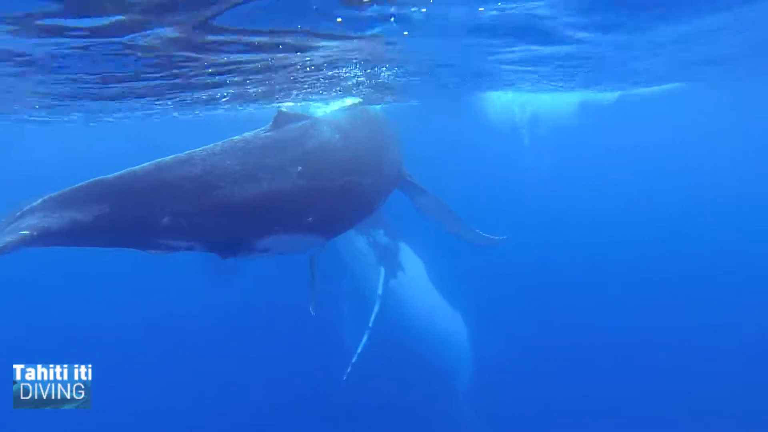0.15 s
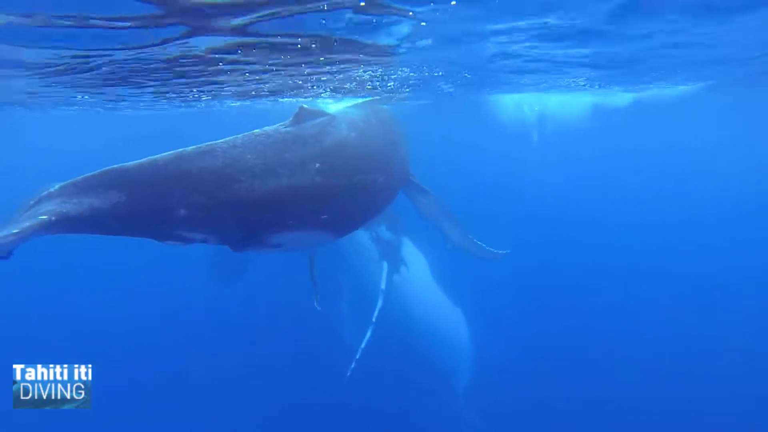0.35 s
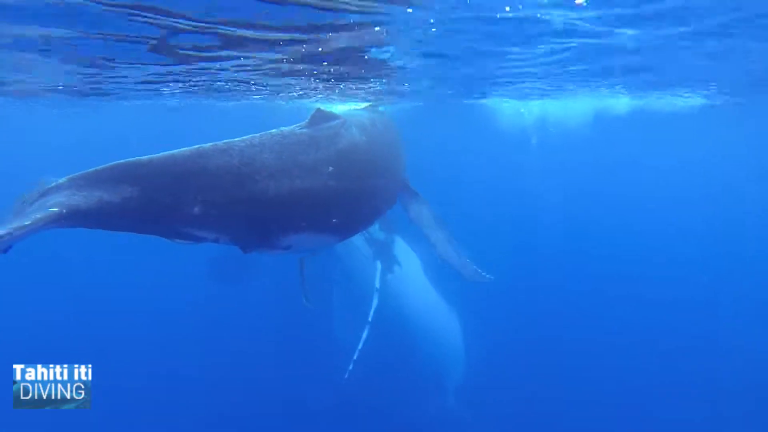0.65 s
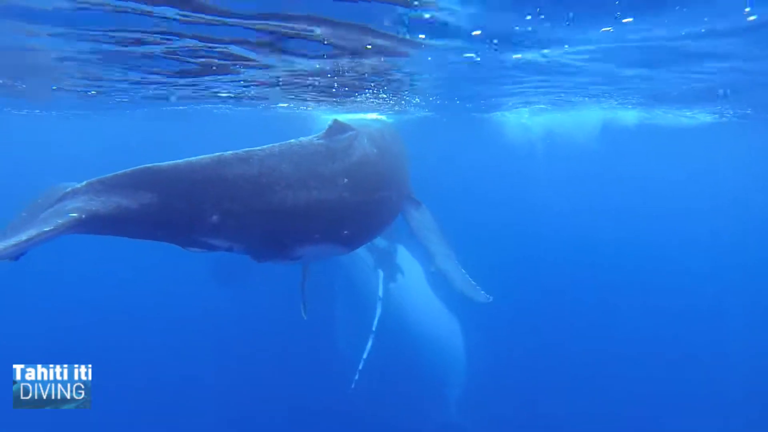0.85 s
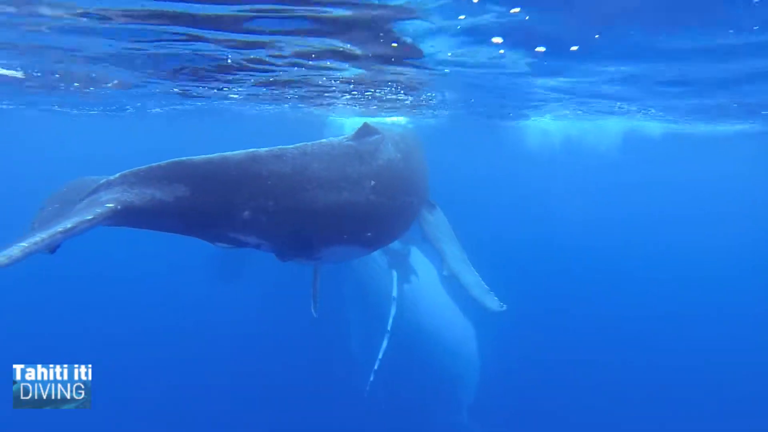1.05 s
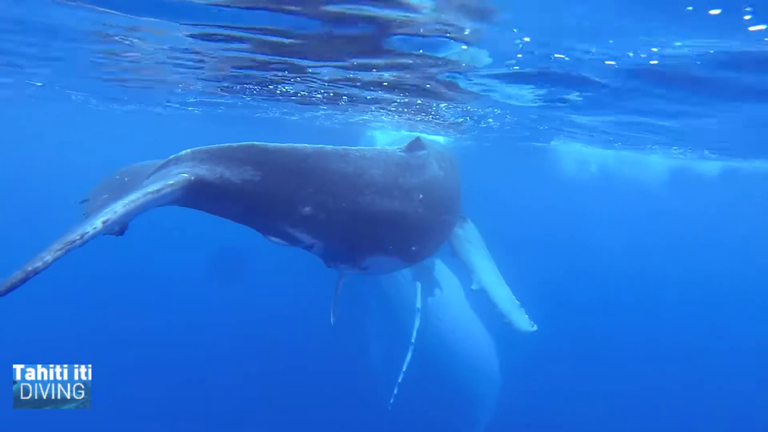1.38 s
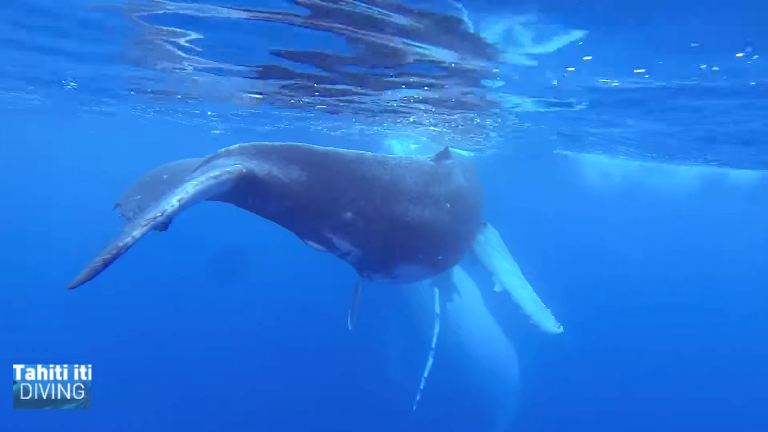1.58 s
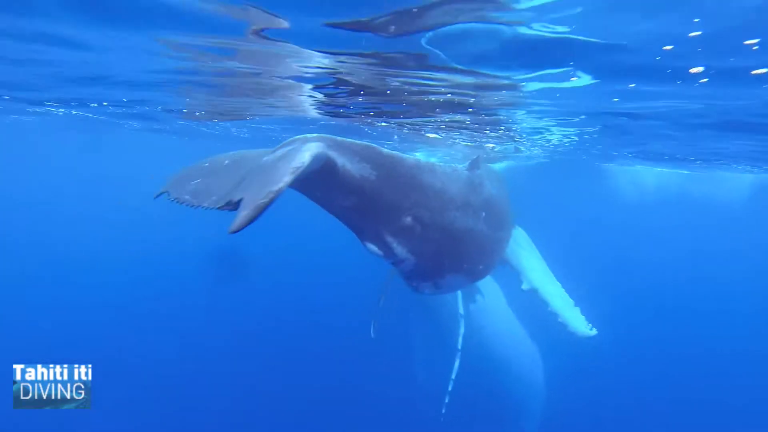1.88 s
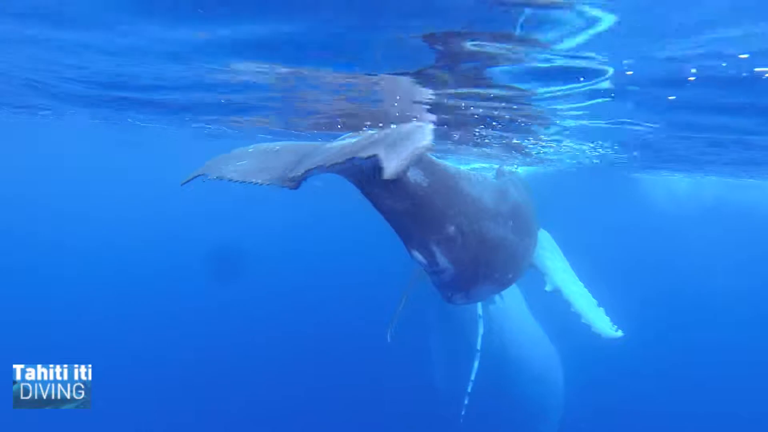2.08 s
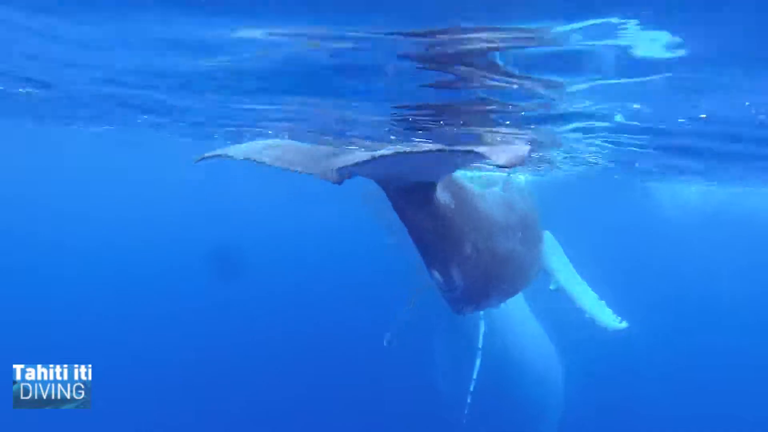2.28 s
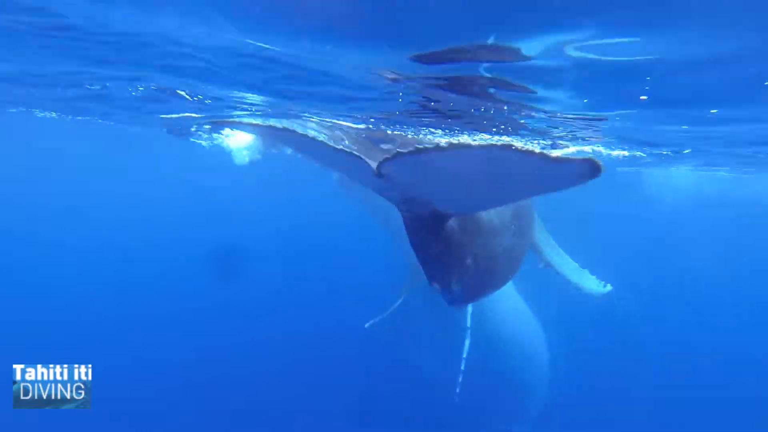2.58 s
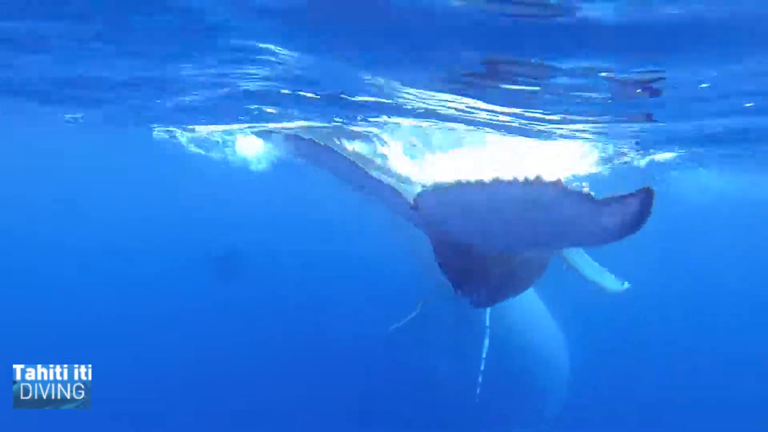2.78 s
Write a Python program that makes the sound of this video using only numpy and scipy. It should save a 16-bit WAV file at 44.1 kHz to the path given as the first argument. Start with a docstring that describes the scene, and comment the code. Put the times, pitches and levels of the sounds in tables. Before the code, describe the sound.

A humpback whale's tonal moan starts low and faint, swells from 0.3 seconds, climbs about half an octave with a hoarse edge, brightens near 1.0 and ends by 1.3, lingering as a fading, wavering echo. Deep throbbing water rumble, soft hum and faint hiss run throughout, with occasional gurgles. Small muffled tail splashes come at 1.7-2.4, strongest after 2.1; a sharp snap and foam fizz at 2.53.

```python
"""Under water, just below the surface: a humpback whale gives one rising moan, a stack of sine partials.
Moving water, filtered noise with a throb and a hum, rumbles throughout under a faint hiss and whines.
Gurgles, bell-shaped swells of narrow noise, join in; the moan lingers in a diffuse noise tail and sines.
Then the tail breaks the surface: short splashes of bubble noise and spray, faint clicks,
and one sharp snap of damped modes in a burst of foam, random pops."""
import sys
import numpy as np
from scipy import signal
from scipy.fft import rfft, irfft
from scipy.io import wavfile
from scipy.ndimage import uniform_filter1d

SR = 44100
rng = np.random.default_rng(int(sys.argv[2]) if len(sys.argv) > 2 else 0)


def materialize(psi):
    """Save the field psi as 16-bit PCM at rate SR to the path in sys.argv[1].

    A 1-D psi becomes a single channel; in a 2-D psi each row is a channel.
    """
    bounded = np.clip(np.atleast_2d(psi).T, -1, 1)
    quanta = np.round(bounded * 32767).astype(np.int16)
    wavfile.write(sys.argv[1], SR, quanta)


N = 129654


def from_db(db):
    """Decibels to gain."""
    return 10 ** (np.asarray(db) / 20)


def rms_one(x):
    """Scale to unit power."""
    return x / np.sqrt(np.mean(x ** 2) + 1e-20)


def seconds():
    """Time of each sample."""
    return np.arange(N) / SR


def in_time(rows, axis=1):
    """One column of a curve, interpolated at each sample."""
    rows = np.array(rows)
    return np.interp(seconds(), rows[:, 0], rows[:, axis])


def at_hz(points, hz):
    """Gain of a spectrum at given frequencies, interpolated over log frequency."""
    f, db = np.transpose(points)
    return from_db(np.interp(np.log(hz + 1e-9), np.log(f), db))


def colour(x, points):
    """Filter by a spectrum."""
    bins_hz = np.arange(N + 1) * SR / (2 * N)
    return irfft(rfft(x, 2 * N) * at_hz(points, bins_hz))[:N]


def noise_of(points):
    """Coloured noise of unit power."""
    return rms_one(colour(rng.standard_normal(N), points))


def drift(rate_hz):
    """Slow random wander of unit power: noise through two equal poles, one value per 40 samples."""
    step = 40
    r = np.exp(-2 * np.pi * rate_hz * step / SR)
    noise = rng.standard_normal(N // step + 2002)
    slow = signal.lfilter([1], [1, -2 * r, r * r], noise)[2000:]  # settled part
    return np.interp(np.arange(N) / step, np.arange(len(slow)), rms_one(slow))


def turning(hz):
    """Running phase of a moving pitch."""
    return 2 * np.pi * np.cumsum(hz) / SR


def swell(s, length_s):
    """A bell-shaped rise and fall."""
    return np.exp(-.5 * ((seconds() - s) / length_s) ** 2)


CLOUD_STEADY, CLOUD_SMOOTH_S = 0.98, 0.0055


def bubble_cloud(hz, width):
    """Bubbles ringing around one pitch: narrow noise levelled to an even warble; unit power."""
    edges_hz = [hz * np.exp(-width), hz * np.exp(width)]
    band = signal.butter(3, edges_hz, "band", fs=SR, output="sos")
    cloud = signal.sosfilt(band, rng.standard_normal(N))
    power = uniform_filter1d(cloud ** 2, int(CLOUD_SMOOTH_S * SR))
    return rms_one(cloud / (power + 1e-12) ** (CLOUD_STEADY / 2))


FADING_DB, FADING_PER_S, ROUGH_PER_S = 5, 14, 74
# Levels of the five lowest partials. Each row: time in seconds, level in dB.
FIRST_DB = [(0, -39.5), (.12, -32), (.32, -18.5), (.36, -21), (.55, -12.5), (.93, -15.5), (1.03, -17.5),
            (1.12, -32), (1.24, -30.5), (1.3, -44.5)]
SECOND_DB = [(0, -35.5), (.24, -34), (.31, -26.5), (.43, -30.5), (.52, -35.5), (.68, -28), (0.991, -29),
             (1.04, -14.5), (1.15, -22.5), (1.2, -31.5), (1.311, -45.5)]
THIRD_DB = [(0, -54.5), (.24, -46.5), (.31, -38.5), (.51, -35.5), (.57, -48), (.85, -43.5), (1.0, -40.5),
            (1.16, -56.5), (1.28, -78.5)]
FOURTH_DB = [(0, -57), (.3, -36.5), (0.571, -42.5), (0.701, -24.5), (.78, -26.5), (.94, -38),
             (1.099, -36.5), (1.28, -66)]
FIFTH_DB = [(0, -39), (.2, -63.5), (0.38, -39), (.47, -45), (.58, -44.5), (0.801, -50), (1.13, -54.5),
            (1.279, -79.5)]


def low_partials(phase, rough):
    """Harmonics 1-5, each on its own level curve; random fading and roughness grow with the number."""
    out = 0
    for k, curve in enumerate((FIRST_DB, SECOND_DB, THIRD_DB, FOURTH_DB, FIFTH_DB), 1):
        level = from_db(in_time(curve) + .5 * k * drift(FADING_PER_S))
        hoarse = 1 + k / 10 * rough * drift(ROUGH_PER_S)
        out = out + level * hoarse * np.sin(k * phase)
    return out


DULLING_FROM_S, DULLING_ABOVE_HZ, DULLING_DB_PER_S = 0.51, 3500, 54.5
SEVENTH_CUT_DB = -4.5
# Upper and treble partials before colour and fading. Each row: time in seconds, level in dB.
UPPER_DB = [(0, -43.5), (.4, -38.5), (.46, -42), (.53, -34), (.565, -47), (.7, -42), (.87, -52.5),
            (.93, -36.5), (1.035, -37.5), (1.08, -53), (1.14, -65.5), (1.28, -81.5)]
TREBLE_DB = [(0, -74), (.1, -68), (.18, -50), (.24, -59), (.32, -46), (.39, -58.5), (.46, -51),
             (.57, -46.5), (.74, -50), (.85, -60), (.97, -56.5), (1.28, -90)]
# Their colours. Each row: frequency in Hz, gain in dB.
UPPER_COLOUR = [(1650, -6.5), (1900, -7.5), (2130, 10), (2300, -3.5), (2490, -2.5), (2620, -14.5),
                (3000, -68)]
TREBLE_COLOUR = [(2450, -25), (2750, -9), (3060, 0), (3480, -10), (3650, -4.5), (4000, -22), (4750, -13.5),
                 (5200, -26), (5700, -36.5), (6500, -54.5)]
# Eighth partial, a clear bright tone. Each row: time in seconds, level in dB.
EIGHTH_DB = [(0, -40), (.3, -45), (.42, -63.5), (.6, -45), (.67, -46.5), (.72, -62.5), (.77, -54.5),
             (.99, -47.5), (1.06, -69.5), (1.25, -92)]


def high_partials(hz, phase, rough):
    """Harmonics 6-20; all but the eighth are coloured by frequency and waver randomly in level."""
    upper, treble = from_db(in_time(UPPER_DB)), from_db(in_time(TREBLE_DB))
    dulling = from_db(-DULLING_DB_PER_S * np.maximum(seconds() - DULLING_FROM_S, 0))
    out = 0
    for k in range(6, 21):
        if k == 8:
            level = from_db(in_time(EIGHTH_DB))  # no fading
        else:
            dulled_share = np.clip((k * hz - DULLING_ABOVE_HZ) / 500, 0, 1)
            level = upper * at_hz(UPPER_COLOUR, k * hz)
            level = level + treble * at_hz(TREBLE_COLOUR, k * hz) * dulling ** dulled_share
            level = level * from_db(FADING_DB * drift(FADING_PER_S) - 3)
        if k == 7:
            level = level * from_db(SEVENTH_CUT_DB)
        hoarse = 1 + rough * drift(ROUGH_PER_S)
        out = out + level * hoarse * np.sin(k * phase + 0.38 * drift(FADING_PER_S))
    return out


PITCH_JITTER = 0.00033  # fraction of pitch
# Pitch of the moan before jitter. Each row: time in seconds, pitch in Hz.
PITCH = [(0, 274.2), (.106, 274.5), (.17, 284.7), (.232, 291.1), (.302, 318), (.39, 335), (.48, 354.2),
         (.588, 364.8), (.738, 374.9), (.966, 384.6), (1.07, 376.3), (1.225, 361.2), (1.31, 388.2)]
# Roughness of the voice. Each row: time in seconds, depth from 0 to 1.
ROUGHNESS = [(.15, .08), (.3, 0.44), (.53, .17), (.7, 0.19)]


def moan():
    """Partials on one gliding pitch, hoarsest during the climb and hooking up at the end."""
    hz = in_time(PITCH) * (1 + PITCH_JITTER * drift(30))
    phase, rough = turning(hz), in_time(ROUGHNESS)
    voice = low_partials(phase, rough) + high_partials(hz, phase, rough)
    ending = np.clip((PITCH[-1][0] + 0.034 - seconds()) / 0.012, 0, 1)
    return np.sqrt(2) * voice * ending


SEA_T60_S, SEA_TREBLE_T60_S, SEA_BUILD_S, SEA_SPLIT_HZ = 1.34, 1, 0.24, 1000
# Colour of the reverberation. Each row: frequency in Hz, gain in dB.
SEA_COLOUR = [(380, -17.5), (750, -22.5), (1100, -34), (1500, -13.5), (2200, -28.5), (5000, -39.5)]


def sea(x):
    """Adds a long diffuse noise tail that builds slowly; its treble dies sooner."""
    t = seconds()
    noise = rng.standard_normal(N) * (1 - np.exp(-t / SEA_BUILD_S))
    low = signal.sosfilt(signal.butter(3, SEA_SPLIT_HZ, "low", fs=SR, output="sos"), noise)
    high = signal.sosfilt(signal.butter(3, SEA_SPLIT_HZ, "high", fs=SR, output="sos"), noise)
    decay, treble_decay = from_db(-60 * t / SEA_T60_S), from_db(-60 * t / SEA_TREBLE_T60_S)
    tail = (low * decay + high * treble_decay) / np.linalg.norm(noise * decay)
    return x + signal.fftconvolve(colour(x, SEA_COLOUR), tail)[:N]


RUMBLE_GAIN_DB, RUMBLE_STEADY = 3, 0.59
THROB_GAIN_DB, HUM_GAIN_DB, HUM_WAVER_DB, WASH_DB = -4.5, -2.5, 5, -49.5
# Spectra of churn and wash. Each row: frequency in Hz, relative density in dB per Hz.
RUMBLE_COLOUR = [(14, -7), (24, 5.5), (42, 6.5), (58, 5.5), (72, -9), (100, -12.5), (135, -17),
                 (200, -29.5), (260, -42), (800, -110)]
WASH_COLOUR = [(150, 1), (400, -2), (700, -9.5), (950, -28), (1250, -29.5), (1550, -21), (1900, -42),
               (4400, -64.5)]
# Churn before its gain. Each row: time in seconds, level in dB.
RUMBLE_LEVEL = [(0, -17.5), (.33, -20), (.39, -23.5), (.75, -22.5), (.88, -23), (1.1, -25), (1.6, -20.5),
                (1.85, -19.5), (2.12, -17.5), (2.27, -19.5), (2.34, -28), (2.48, -20.5), (2.94, -24)]
# Throb and hum before gain and waver. Each row: time in seconds, pitch in Hz, level in dB.
THROB = [(0, 44.5, -38.5), (.33, 47.96, -11.5), (.39, 51.3, -40), (.64, 51.14, -22), (.74, 47.9, -16),
         (.85, 47.2, -24.5), (1.1, 52.05, -13.5), (1.27, 47.32, -19), (1.46, 47.48, -13),
         (1.75, 54.92, -14.5), (1.87, 49.1, -30.5), (2.05, 47.42, -14.5), (2.26, 57.93, -16.5),
         (2.38, 60.61, -19.5), (2.56, 54.48, -11), (2.69, 48, -9), (2.82, 47.92, -31.5)]
HUM = [(0, 154.8, -55.5), (.33, 154.6, -33.5), (.5, 179.5, -37.5), (.72, 158.7, -34), (.9, 162.7, -34.5),
       (1.01, 161.5, -25), (1.15, 167.3, -51.5), (1.29, 171.3, -28.5), (1.46, 166.6, -32),
       (1.68, 169.5, -27.5), (1.84, 169.3, -46.5), (1.96, 163.9, -31.5), (2.07, 160.3, -29),
       (2.37, 153.6, -47), (2.55, 154.5, -36), (2.94, 173.6, -34.5)]


def rumble():
    """Moving water: partly levelled low noise, a deep throb, a wavering hum and a soft wash above."""
    churn = noise_of(RUMBLE_COLOUR)
    power = uniform_filter1d(churn ** 2, SR // 12)
    churn = rms_one(churn / (power + 1e-6) ** (RUMBLE_STEADY / 2))
    churn = churn * from_db(in_time(RUMBLE_LEVEL) + RUMBLE_GAIN_DB)
    throb_level = from_db(in_time(THROB, axis=2) + THROB_GAIN_DB + 0.64 * drift(20))
    throb = throb_level * np.sin(turning(in_time(THROB)))
    hum_level = from_db(in_time(HUM, axis=2) + HUM_GAIN_DB + HUM_WAVER_DB * drift(14))
    hum = hum_level * np.sin(turning(in_time(HUM)) + .5 * drift(24))
    wash = noise_of(WASH_COLOUR) * from_db(WASH_DB + 5.3 * drift(24))
    return churn + np.sqrt(2) * (throb + hum) + wash


HISS_DB = -80.5
# Hiss with a narrow band near 4 kHz. Each row: frequency in Hz, relative density in dB per Hz.
HISS_COLOUR = [(3300, -9.5), (3650, -16), (3930, 2), (4300, -20), (15000, -30)]
# Thin whines. Each row: frequency in Hz, level in dB.
WHINES = [(3946, -88.5), (7752, -96.5), (7849, -99)]


def hiss_and_whines():
    """Steady faint coloured noise and fixed high sines."""
    hiss = noise_of(HISS_COLOUR) * from_db(HISS_DB)
    whines = sum(from_db(db) * np.sin(2 * np.pi * hz * seconds()) for hz, db in WHINES)
    return hiss + np.sqrt(2) * whines


GURGLE_WIDTH = 0.23  # half band, natural log of frequency ratio
# Large bubbles, then small clear ones.
# Each row: centre time in seconds, bell width in seconds, pitch in Hz, level in dB.
GURGLES = [(0.585, .05, 564, -42.5), (0.978, 0.038, 452, -29.5), (0.998, 0.032, 274.4, -33),
           (1.514, 0.041, 231.8, -44), (1.666, 0.0084, 565.8, -41.5), (1.741, 0.0089, 529.6, -46),
           (1.918, .012, 542, -59.5), (2.185, 0.013, 603, -41), (2.25, 0.017, 112.8, -21.5),
           (1.112, 0.04, 99.6, -29), (2.768, 0.0079, 550, -48.5), (2.879, 0.036, 111.3, -30)]
PINGS = [(2.079, 0.0026, 2262, -44.5), (2.119, 0.0025, 2250, -41.5), (2.353, 0.0034, 3228, -39)]


def gurgles():
    """Large bubbles swell as narrow noise; small ones ping as short sines."""
    low, pings = 0, 0
    for s, length_s, hz, db in GURGLES:
        low = low + bubble_cloud(hz, GURGLE_WIDTH) * from_db(db) * swell(s, length_s)
    for s, length_s, hz, db in PINGS:
        pings = pings + np.sin(2 * np.pi * hz * seconds()) * from_db(db) * swell(s, length_s)
    return low + np.sqrt(2) * pings


LINGER_FROM_S, LINGER_RISE_S, LINGER_WAVER_DB = 1.4, .07, 1.5
# Partials ringing on in the sea. Each row: frequency in Hz, level in dB before waver, T60 in seconds.
LINGERING = [(373, -39.5, 1.7), (767.4, -41.5, 1.09), (1490, -63, 0.45)]


def lingering():
    """Three partials rise as the moan ends, then decay, wavering in level and phase."""
    age = seconds() - LINGER_FROM_S
    rise = np.exp(np.minimum(age, 0) / LINGER_RISE_S)
    out = 0
    for hz, db, t60_s in LINGERING:
        level = from_db(db - 60 * np.maximum(age, 0) / t60_s + LINGER_WAVER_DB * drift(15))
        out = out + level * np.sin(2 * np.pi * hz * age + .5 * drift(3.7))
    return np.sqrt(2) * rise * out


SPLASH_WIDTH, SPLASH_TOP_HZ = 0.12, 3239
# Splashes of the tail before muffling. Each row: peak time in seconds, attack and decay time constants
# in seconds, bubble pitch in Hz, bubble level in dB, spray level in dB.
SPLASHES = [(1.697, 0.0059, 0.0071, 2574, -59, -57), (1.715, .002, 0.004, 2500, -52, -65.5),
            (1.775, 0.0017, 0.0019, 1670, -56, -45.5), (1.833, 0.00347, 0.0043, 1307, -57.5, -56.5),
            (2.028, 0.015, 0.0094, 1418, -54, -67.5), (2.074, 0.0044, 0.013, 1517, -42, -44.5),
            (2.116, 0.0033, 0.0038, 1540, -30.5, -46), (2.175, 0.0013, .012, 1330, -31.5, -40.5),
            (2.214, 0.031, 0.017, 965, -57, -47), (2.248, 0.00068, .004, 1170, -37, -42),
            (2.355, 0.0047, 0.0061, 1027, -36.5, -35.5)]
# Spray spectrum. Each row: frequency in Hz, relative density in dB per Hz.
SPRAY_COLOUR = [(300, -16), (800, 6), (1600, 7.5), (1900, -22), (2250, 3), (2600, -14), (3250, 0.5),
                (3600, -9.5), (9000, -46.5)]


def splashes():
    """Each slap traps a bubble cloud and throws broader spray; water muffles both steeply."""
    t, out = seconds(), 0
    spray = noise_of(SPRAY_COLOUR)
    for s, attack_s, decay_s, hz, db, spray_db in SPLASHES:
        shape = np.exp(-np.maximum((s - t) / attack_s, (t - s) / decay_s))
        bubbles = from_db(db) * bubble_cloud(hz, SPLASH_WIDTH)
        out = out + shape * (bubbles + from_db(spray_db) * spray)
    return signal.sosfilt(signal.cheby1(8, 1, SPLASH_TOP_HZ, fs=SR, output="sos"), out)


# One sharp snap among faint ones. Each row: time in seconds, click level in dB.
SNAPS = [(2.13, -35.5), (2.256, -35.5), (2.5277, -2.5), (2.545, -45), (2.573, -34), (2.692, -37.5)]
# Ringing modes. Each row: frequency in Hz, gain in dB, T60 in seconds.
SNAP_MODES = [(660, -15.5, 0.0055), (1560, -23, 0.014), (2390, -17.5, 0.0071), (3420, -22.5, 0.0075),
              (4500, -30, 0.012), (5400, -26, 0.0063), (6340, -31.5, 0.0094), (7660, -32.5, 0.0062)]


def snaps():
    """Single-sample clicks excite quickly damped resonators of alternating sign, low-passed at 8 kHz."""
    clicks, out = np.zeros(N), 0
    for s, db in SNAPS:
        clicks[int(s * SR)] = from_db(db)
    for k, (hz, db, t60_s) in enumerate(SNAP_MODES):
        r, w = from_db(-60 / (t60_s * SR)), 2 * np.pi * hz / SR
        ring = signal.lfilter([0, np.sin(w)], [1, -2 * r * np.cos(w), r * r], clicks + 1e-18)
        out = out + (-1) ** k * from_db(db) * ring
    return signal.sosfilt(signal.butter(4, 8000, fs=SR, output="sos"), out)


FOAM_POPS_PER_S = 1100
# Fizz of the foam. Each row: time in seconds, level in dB.
FOAM_LEVEL = [(1.5, -94.5), (2.2, -67), (2.3, -75), (2.51, -68.5), (2.535, -48), (2.58, -63), (2.67, -64.5),
              (2.74, -74), (2.94, -89)]
# Foam spectrum. Each row: frequency in Hz, relative density in dB per Hz.
FOAM_COLOUR = [(800, -1), (3200, -3), (3900, -20), (6000, -20.5), (9000, -27.5), (15000, -46.5)]


def foam():
    """Tiny bubbles burst at random: sparse pops of very uneven size, coloured."""
    pops = (rng.random(N) < FOAM_POPS_PER_S / SR) * rng.laplace(size=N)
    return rms_one(colour(pops, FOAM_COLOUR)) * from_db(in_time(FOAM_LEVEL))


def scene():
    """The call over the sounds of the water; one channel."""
    call = sea(moan()) + lingering()
    water = rumble() + gurgles()
    tail = splashes() + snaps() + foam()
    return (call + water + tail + hiss_and_whines())[None]


CUTOFF_HZ = 15600


def record(dry):
    """Low-pass: at least 70 dB down from the cutoff up."""
    return signal.sosfilt(signal.cheby2(12, 70, CUTOFF_HZ, fs=SR, output="sos"), dry)


dry = scene()
out = record(dry)
materialize(out)
```